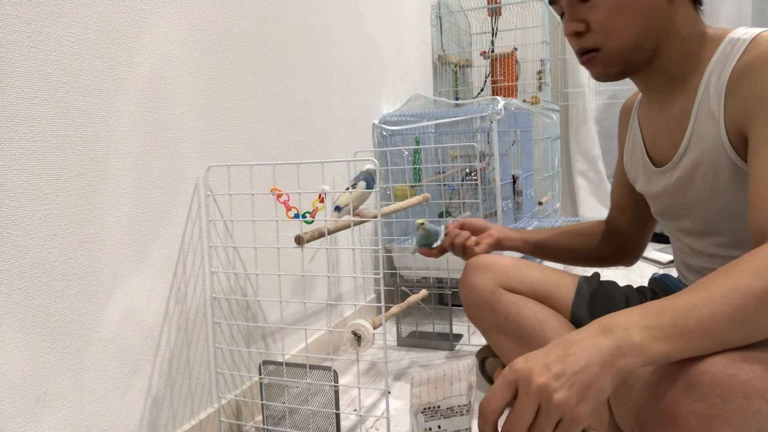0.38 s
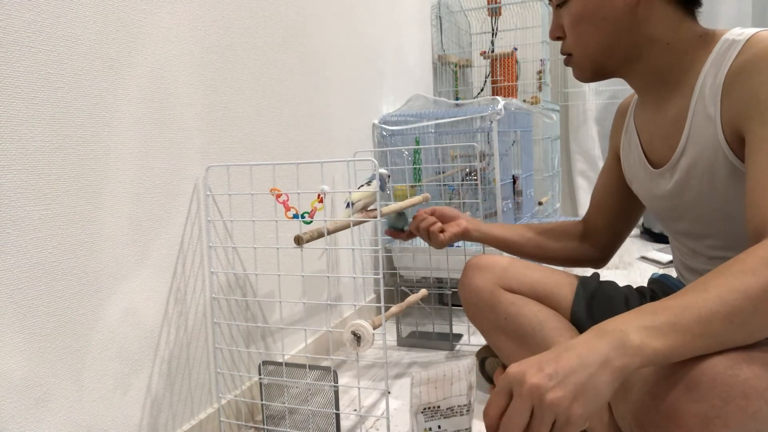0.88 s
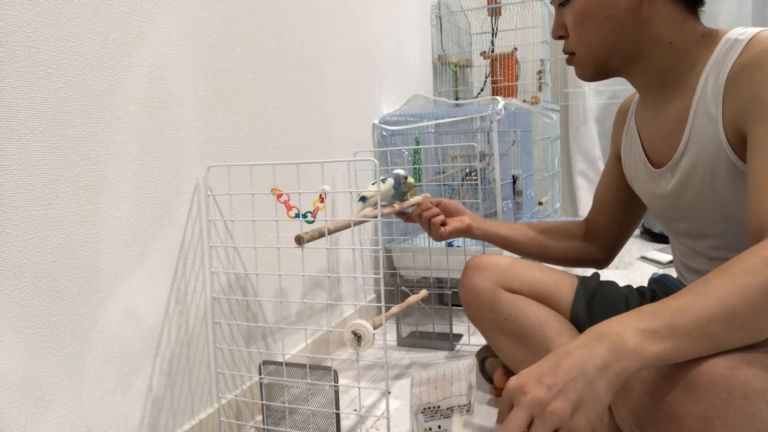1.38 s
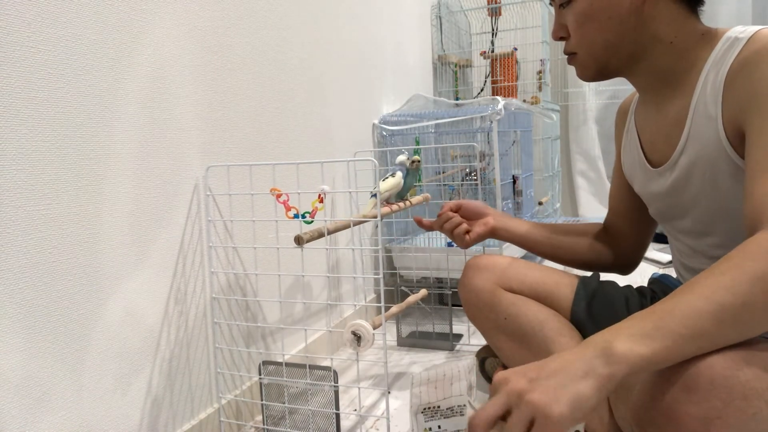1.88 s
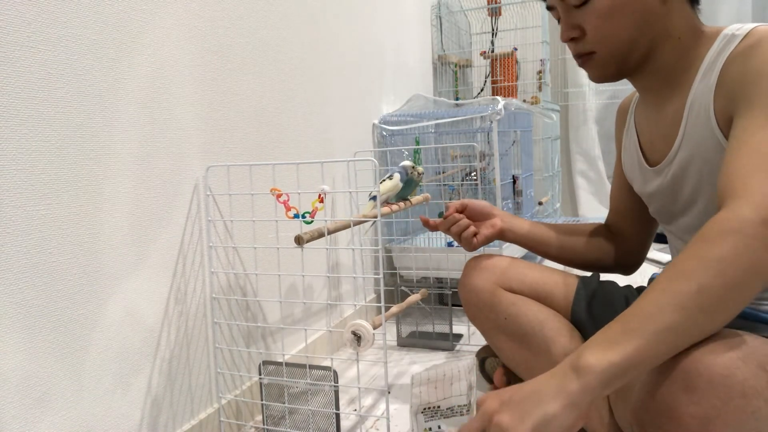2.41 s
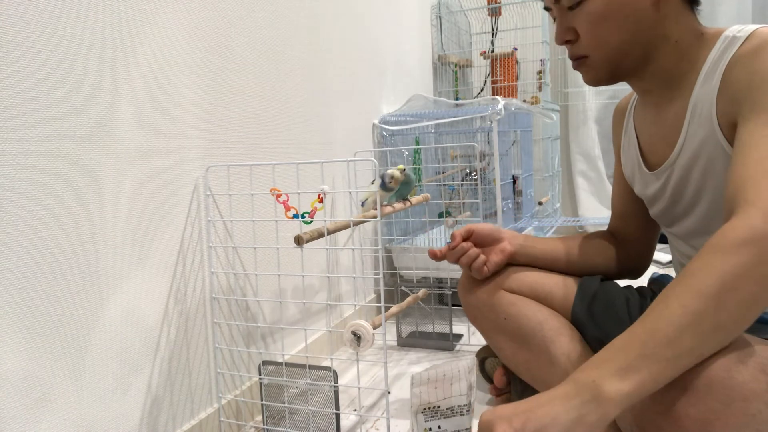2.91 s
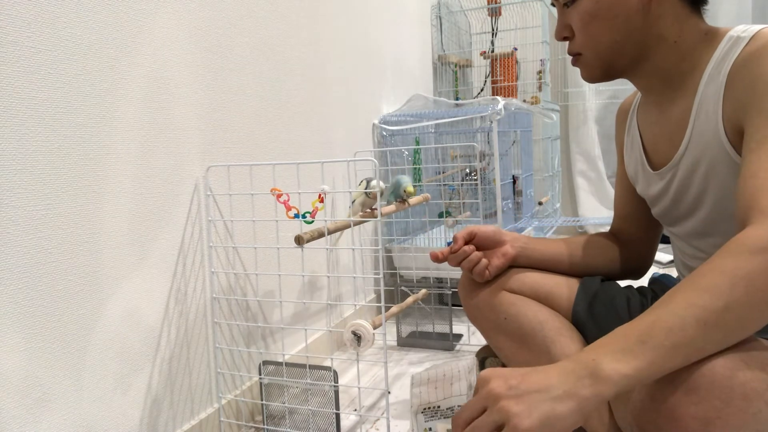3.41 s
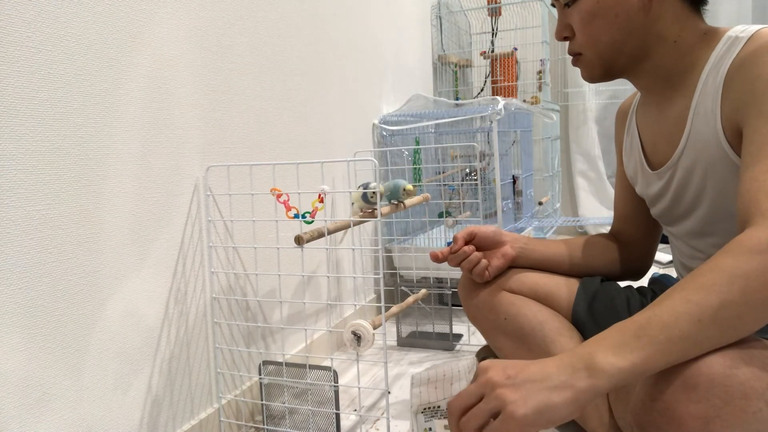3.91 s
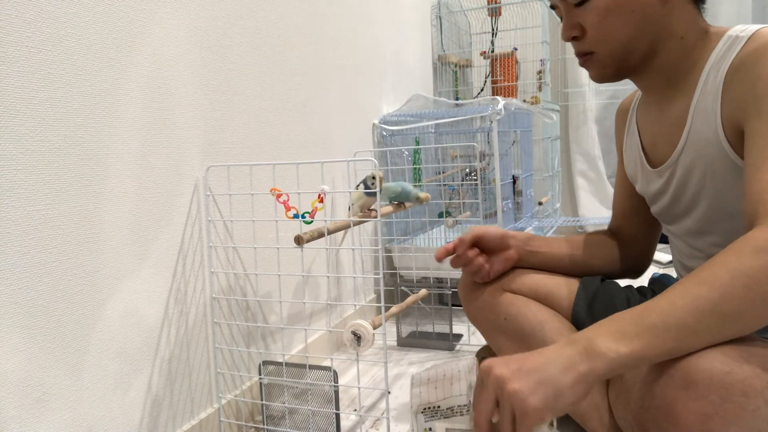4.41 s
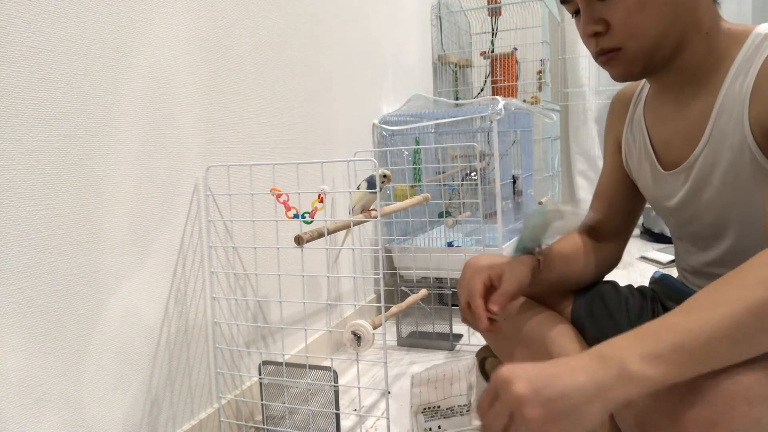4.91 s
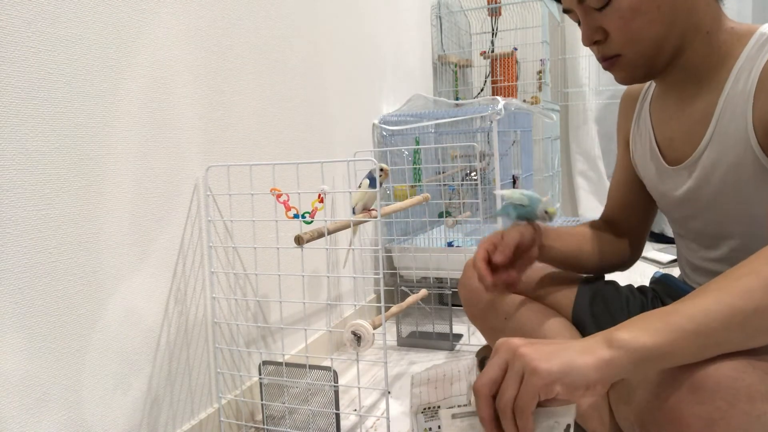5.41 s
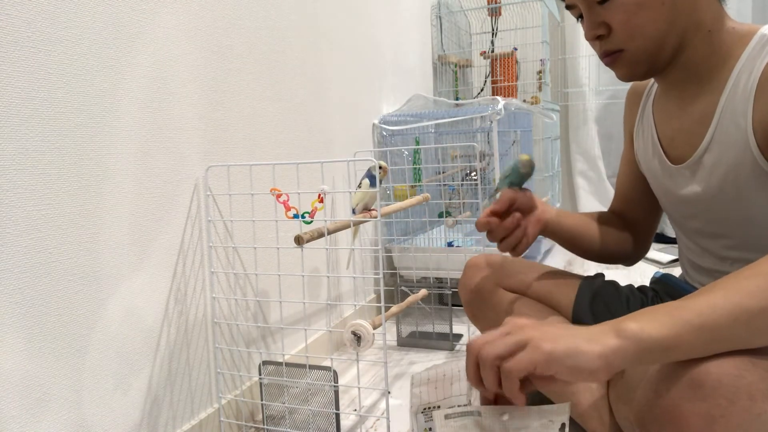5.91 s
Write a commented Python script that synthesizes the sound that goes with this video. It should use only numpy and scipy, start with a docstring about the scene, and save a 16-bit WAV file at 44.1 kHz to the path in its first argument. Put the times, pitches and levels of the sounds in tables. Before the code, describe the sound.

Crisp plastic film snaps and rustles about a metre away indoors, busy at first, nearly silent midway, then a final loud crackle fades.

```python
"""A small, quiet room where a hand works a stiff plastic packet, about a metre from a phone.
Creases snap over one by one as short jerks ringing a panel; noise and crackle in patches of film make
the rustle, and rubbing noise sings through an air pocket as a fold slides. Small dull taps ring a hollow
body and a few puffs of air rumble on the microphone. The room rings briefly over a low, wavering hush."""
import sys
import numpy as np
from scipy import signal
from scipy.fft import rfft, irfft, next_fast_len
from scipy.io import wavfile
from scipy.ndimage import uniform_filter1d

SR = 44100
rng = np.random.default_rng(int(sys.argv[2]) if len(sys.argv) > 2 else 0)


def transcribe(signal):
    """Save signal, clipped to [-1, 1], as a 16-bit WAV file at the path in sys.argv[1]."""
    frames = np.atleast_2d(signal).T
    limited = np.clip(frames, -1, 1)
    pcm = np.round(limited * 32767).astype(np.int16)
    wavfile.write(sys.argv[1], SR, pcm)


def nominal_scale(level):
    """Amplitude ratio for a level in decibels (scalar or array-like)."""
    x = np.asarray(level, float) / 20
    return 10 ** x


N = 266893  # length in samples


def level(x, db):
    """Scale to an rms level in dB."""
    return x * nominal_scale(db) / np.sqrt(np.mean(x ** 2))


def ring(x, hz, width_hz):
    """One resonance, gain 1 at the centre."""
    return signal.lfilter(*signal.iirpeak(hz, hz / width_hz, fs=SR), x)


def cut(x, hz, kind, order=2):
    """High-pass or low-pass."""
    return signal.sosfilt(signal.butter(order, hz, kind, fs=SR, output="sos"), x)


def colour(x, points):
    """Filter by a gain curve of (Hz, dB) points, straight over log frequency."""
    hz, db = np.transpose(points)
    size = next_fast_len(len(x))
    f = np.maximum(np.fft.rfftfreq(size, 1 / SR), 1)
    gain = nominal_scale(np.interp(np.log(f), np.log(hz), db))
    return irfft(rfft(x, size) * gain, size)[:len(x)]


def walk(rate):
    """Random levels held 1 / rate seconds and slewed twice; spread 1."""
    k = int(SR / rate)
    steps = np.repeat(rng.standard_normal(N // k + 1), k)
    steps = uniform_filter1d(uniform_filter1d(steps, k), k)[:N]
    return steps / steps.std()


def add(out, s, sound, peak_db):
    """Lay a sound down at a time in seconds with a given peak."""
    i = int(s * SR)
    out[i:i + len(sound)] += (sound * nominal_scale(peak_db) / np.abs(sound).max())[:N - i]


def gesture(s, hold, db, change_db, on_db_per_s, off_db_per_s):
    """Level in dB of one move: it rises, holds with a steady drift and falls away."""
    t = np.arange(N) / SR - s
    hold = max(hold, .005)
    drift = change_db * np.clip(t / hold, 0, 1)
    rise = on_db_per_s * np.minimum(t, 0)
    fall = off_db_per_s * np.maximum(t - hold, 0)
    return db + drift + rise - fall


# Tone of the room air and microphone hiss. Each row: frequency in Hz, relative density in dB per Hz.
HUSH_TONE = [(20, -36), (45, -11.5), (110, -3.5), (200, 0), (260, -6), (500, -13.5), (800, -19),
             (1700, -26.5), (5000, -40), (8000, -42.5), (16000, -45.5)]


def hush():
    """The air of the room and the microphone's own hiss, wavering slowly, with a faint narrow whine."""
    whine = level(ring(rng.standard_normal(N), 5800, 150), -90.0)
    air = level(colour(rng.standard_normal(N), HUSH_TONE), -60.5)
    return air * nominal_scale(1.3 * walk(4.5)) + whine


def crackle(rate, spread_db):
    """Tiny creases at random moments, most faint and a few strong, each smeared over a few milliseconds."""
    sizes = (rng.random(N) < rate / SR) * nominal_scale(spread_db * rng.exponential(size=N))
    smear = signal.lfilter([1], [1, -np.exp(-1 / (0.0027 * SR))], sizes)
    return smear * rng.standard_normal(N)


# The hand's moves on the film. Each row: start in seconds, hold in seconds, level in dB,
# change during the hold in dB, brightness in dB per octave.
HAND_MOVES = [(0.01, 0.16, -69, -6, -2), (0.514, 0.05, -62, -1, -4.5), (0.885, 0.078, -71.5, 4, -0.5),
              (1.109, 0.07, -56.5, 1.5, -1.5), (1.272, 0.063, -51, -0.5, -2), (1.48, .34, -61.5, 8, -2),
              (1.92, 0.035, -68, -0.5, 7.5), (2.118, 0.085, -60.5, 3.5, 4.5), (2.24, .09, -52, 2, -2),
              (2.456, 0.33, -48, -2, 2), (2.878, .3, -57.5, -5, 4), (3.358, 0.2, -66.5, -12.5, 1),
              (4.115, 0.31, -73, -6, 0.5), (4.573, 0.26, -55, 10.5, -1.5), (4.97, 0.16, -56, 0.5, -1),
              (5.197, 0.061, -49, -2, 1), (5.885, 0.024, -65.5, -1.5, -3.5)]
# Overall tone of the film. Each row: frequency in Hz, filter gain in dB.
FILM_TONE = [(200, -12), (500, -1.5), (1100, -1), (2000, 0), (4700, -6), (6600, -9), (7700, -8.5),
             (8600, -17.5), (16000, -17.5)]


def rustle():
    """Hiss and crackle in patches of film from large to small, each with its own creases and flicker;
    brighter handling lifts the small patches."""
    grip_db_per_s, let_go_db_per_s = 298.5, 203
    at_rest = nominal_scale(-84)
    moves = np.array([nominal_scale(gesture(*move[:4], grip_db_per_s, let_go_db_per_s)) for move in HAND_MOVES])
    gain = moves.sum(axis=0) + at_rest
    # brightness follows whichever move is loudest; 4.7 dB per octave at rest
    tilt = (np.transpose(HAND_MOVES)[4] @ moves + 4.7 * at_rest) / gain
    shared = level(crackle(610, 2.4), -11.5)
    patches_hz = 350 * 1.7 ** np.arange(8)
    film = 0
    for hz in patches_hz:
        own_creases = level(crackle(120, 3.45), -4)
        drive = shared + own_creases + level(rng.standard_normal(N), -6)
        flicker_db = 3.9 * walk(25)
        film = film + ring(drive, hz, 0.96 * hz) * nominal_scale(tilt * np.log2(hz / 2500) + flicker_db)
    return gain * level(colour(film, FILM_TONE), 0)


# Air pushed at the microphone. Each row: centre in seconds, level at the centre in dB,
# time from the centre to 1/e in seconds.
AIR_PUFFS = [(0.023, -58, 0.053), (4.89, -55.5, 0.09), (1.24, -64.5, 0.23), (5.957, -58.5, 0.043)]


def puffs():
    """Short gusts rumble on the microphone port: low resonant noise under bell-shaped swells."""
    t = np.arange(N) / SR
    gust = sum(nominal_scale(db) * np.exp(-((t - s) / length) ** 2) for s, db, length in AIR_PUFFS)
    rumble = ring(ring(rng.standard_normal(N), 66, 60), 66, 60)
    return gust * level(rumble, 0)


# Creases snapping over. Each row: start in seconds, panel peak in dB, panel ring in Hz,
# treble relative to the panel in dB, decay time of the jerks in milliseconds.
CREASE_SNAPS = [(0.0464, -51.5, 1760, -17, 4.3), (0.19, -49.5, 1610, -15, 6.2),
                (0.252, -20.5, 4040, -30, 1.4), (0.28, -30, 1650, -37, 1.1),
                (0.321, -21, 1920, -14.5, 1.07), (0.504, -44.5, 1600, -33, 3.4),
                (0.528, -48, 4000, -11, 2.5), (0.598, -28, 2340, -45, 1.7), (0.6957, -17, 4090, -7.5, 1.22),
                (0.8618, -49, 2160, -25, 3.9), (0.9354, -28, 3750, -12, 2.2),
                (1.0945, -17.5, 4140, -25, 1.34), (1.1189, -27, 1540, -23, 4.1),
                (1.2508, -33, 1330, -50, 0.24), (1.353, -38, 2100, -13, 8.8), (1.372, -44, 1280, -17, 2.4),
                (1.47, -28, 1800, -39, 3.6), (1.525, -15, 3080, -1.5, 2.85), (1.544, -24, 1430, -22, 2.5),
                (1.6488, -36.5, 1680, -30, 4.1), (1.7264, -19, 2280, -25, 1.7),
                (1.7469, -18, 4900, -10, 1.3), (1.7778, -15.5, 4030, -33, 1), (1.863, -43.5, 4500, 2, 4.5),
                (1.9614, -34, 1930, -24, 2), (2.152, -28, 2530, -7.5, 3.2), (2.177, -35, 2400, -16, 4.9),
                (2.3028, -34, 1600, -24, 1.5), (2.4201, -24, 3390, -1, 4.4), (2.4478, -25, 2300, -16, 4.5),
                (2.5211, -28, 2800, -12, 3), (2.5536, -30.5, 2930, -22, 2.5),
                (2.5868, -36.5, 1400, -25, 2.8), (2.6337, -25, 2640, -31, 1.4), (2.655, -31, 1210, -8, 3.4),
                (2.781, -36, 1600, -7, 3), (3.111, -44.5, 1930, -17, 1.1), (3.1303, -34, 2450, -28, 2.5),
                (3.3329, -47, 4900, -4.5, 4.6), (3.765, -53, 1900, -14, 1.2),
                (4.2844, -46.5, 3950, -8.5, 9.5), (4.5597, -37, 2300, 2, 4.4),
                (4.608, -25.5, 2980, -16, 1.3), (4.6615, -30, 1910, -26, 1.1),
                (4.6859, -29.5, 2080, -17, 3.2), (4.728, -8, 3380, -3, 2.16), (4.745, -10, 5600, -2, 0.96),
                (4.8918, -28.5, 2300, -31, 5.9), (5.036, -14, 2900, -5, 2.1), (5.478, -56.5, 2200, -20, 2),
                (5.628, -57.5, 2784, -24, 1.1), (5.925, -54, 2000, -22, 1.9)]


def snaps():
    """A crease lets go in a short run of jerks: the panel rings, edges tick, the bag thumps a little later.
    The walls hear all sides of the bag at once, so their share is the same crack with a smoother colour."""
    near, walls, ms = np.zeros(N), np.zeros(N), np.arange(1024) / SR * 1000
    chance = rng.standard_normal((len(CREASE_SNAPS), 2, len(ms)))
    click = 1. * (ms == 0)
    for (s, db, hz, treble_db, length_ms), noise in zip(CREASE_SNAPS, chance):
        # squared noise is spiky; the click makes the first jerk the strongest
        jerks, ticks = (noise * np.abs(noise) + 8.0 * click) * np.exp(-ms / max(length_ms, .2))
        panel = ring(jerks, hz, 0.13 * hz) + nominal_scale(-9) * cut(jerks, 1100, "high")
        add(near, s, cut(panel, 4200 + 0.43 * hz, "low", order=4), db)
        add(near, s, ring(cut(ticks, 5900, "high"), 6100, 8000), db + treble_db)
        # the thump grows less from snap to snap than the crack does
        thump = ring(ring(jerks, 390, 540), 390, 540)
        add(near, s + .002, thump, 0.54 * db - 27.5)
        smooth = ring(click, hz, 0.59 * hz) + nominal_scale(2.5) * cut(click, 250, "high")
        smooth = cut(smooth, 4700, "low", order=3) + nominal_scale(treble_db) * cut(click, 5500, "high")
        # a longer run of jerks gives the walls more energy
        add(walls, s, smooth, db + 10 * np.log10(1.9 * length_ms))
    return near, walls


# Dull taps on something hollow. Each row: start in seconds, peak in dB, ring in Hz.
HOLLOW_TAPS = [(1.426, -41.5, 590), (2.09, -48, 620), (2.179, -40, 920), (2.213, -34, 1020),
               (2.287, -34.5, 680), (2.394, -44, 651), (2.411, -27, 694), (2.508, -32.5, 555),
               (2.553, -29.5, 744), (2.634, -38, 510), (2.653, -36, 686), (2.692, -43, 620),
               (3.05, -47, 600), (4.892, -34, 635)]


def taps():
    """A soft push sets a hollow body ringing for a few cycles."""
    out = np.zeros(N)
    chance = rng.standard_normal((len(HOLLOW_TAPS), 1536))
    for (s, db, hz), noise in zip(HOLLOW_TAPS, chance):
        push = cut(noise, 1800, "low") * np.exp(-np.arange(len(noise)) / SR / 0.0021)
        body = ring(push, hz, 170) + 0.3 * ring(push, 1.17 * hz, 600)
        add(out, s, body, db)
    return out


# A fold sliding along the bag. Each row: start in seconds, hold in seconds, level in dB,
# change during the hold in dB.
FOLD_STROKES = [(2.434, .075, -52.5, 1.5), (4.872, 0.15, -59, -0.5), (5.067, 0.085, -56, 5.5),
                (5.188, 0.044, -43.5, 0)]
# Resonances of the air pocket in the fold. Each row: frequency in Hz, width in Hz,
# level at the firmest stroke in dB.
POCKET_MODES = [(1600, 400, -8), (2280, 705, 3), (2900, 230, -6.5), (4100, 560, -2.5), (4870, 440, -7.5)]


def slide():
    """Stick-slip friction excites the air pocket of the fold; a firmer stroke wakes its upper resonances."""
    on_db_per_s, off_db_per_s = 230, 328
    rub = nominal_scale(1.1 * walk(130)) * rng.standard_normal(N)
    strokes = [gesture(*stroke, on_db_per_s, off_db_per_s) for stroke in FOLD_STROKES]
    db = np.max(strokes, axis=0)
    firm_db = 0.62 * (db - db.max())  # per octave above 2250 Hz
    pocket = 0
    for hz, width_hz, mode_db in POCKET_MODES:
        mode = level(ring(ring(rub, hz, width_hz), hz, width_hz), 0)
        pocket = pocket + nominal_scale(mode_db + firm_db * max(np.log2(hz / 2250), 0)) * mode
    return nominal_scale(db) * pocket


# Bands of the room's tail. Each row: centre in Hz, time to fall by 60 dB in seconds, energy in dB.
ROOM_BANDS = [(258, 0.3, -19), (774, 0.48, -22), (1900, 0.45, -17), (4770, 0.14, -25.5), (8850, 0.43, -16),
              (13220, 0.26, -14.5)]


def room(near, walls):
    """An echo off the floor, then a diffuse tail that builds up and dies band by band."""
    t = np.arange(SR // 2) / SR
    build_up = 1 - np.exp(-(t / 0.00084) ** 2)
    tail = 0
    for hz, t60, db in ROOM_BANDS:
        decay = np.exp(-np.log(1000) * t / t60)
        band = ring(rng.standard_normal(len(t)), hz, 1.5 * hz) * decay * build_up
        tail = tail + nominal_scale(db) * band / np.sqrt(np.sum(band ** 2))
    lag = int(1.9 * SR / 1000)  # floor echo after 1.9 ms
    echo = nominal_scale(-18.5) * np.pad(near, (lag, 0))[:N]
    return near + echo + signal.fftconvolve(walls, tail)[:N]


def scene():
    """Handling sounds pass through the room, the slide drier than the rest; puffs and hush stay outside it."""
    air, film, gusts = hush(), rustle(), puffs()
    near, walls = snaps()
    tap, stroke = taps(), slide()
    near = near + film + tap + stroke
    walls = walls + film + nominal_scale(0.5) * tap + nominal_scale(-7) * stroke
    return (room(near, walls) + gusts + air)[None]


def band_limit(x):
    """A steep low-pass at the top of the band."""
    return signal.sosfilt(signal.butter(12, 16870, fs=SR, output="sos"), x)


def record(dry):
    """A phone microphone, deaf to the lowest bass and the top."""
    top = signal.ellip(6, .3, 40, 15900, fs=SR, output="sos")  # steep low-pass, Hz
    mix = signal.sosfilt(top, cut(dry, 31, "high"))
    return band_limit(mix)


dry = scene()
out = record(dry)
transcribe(out)
```